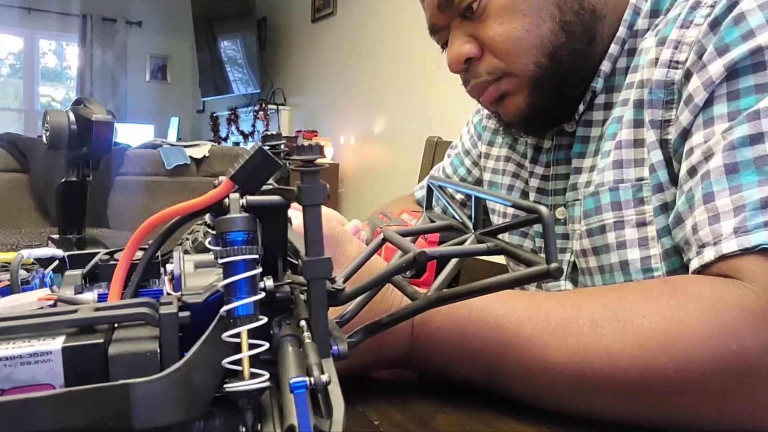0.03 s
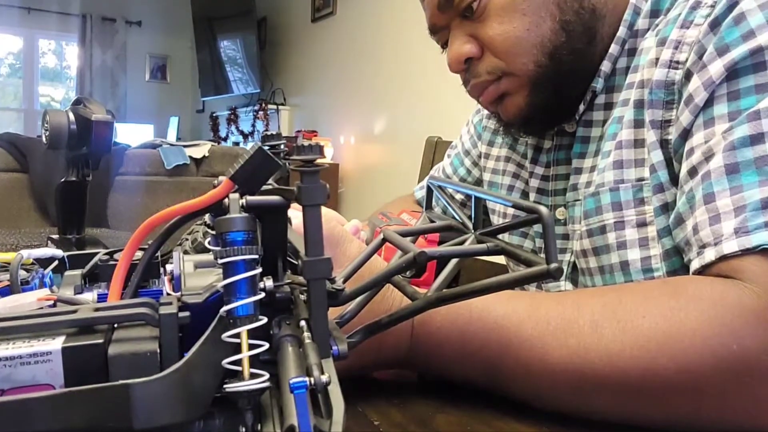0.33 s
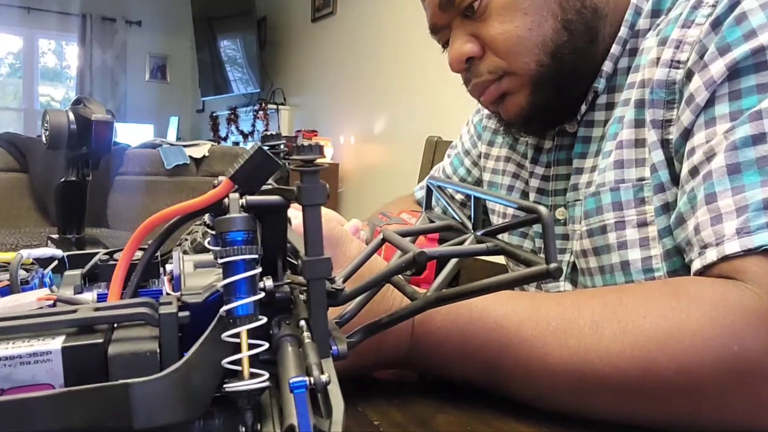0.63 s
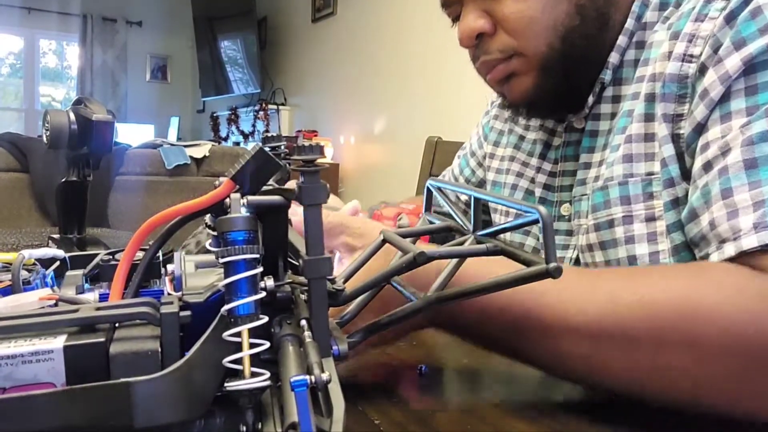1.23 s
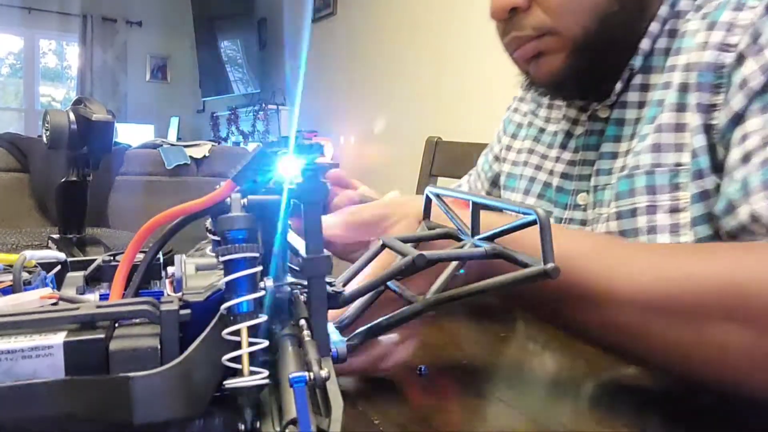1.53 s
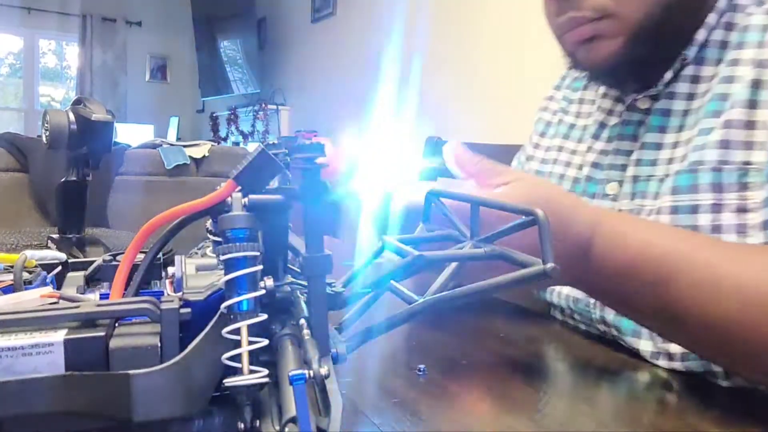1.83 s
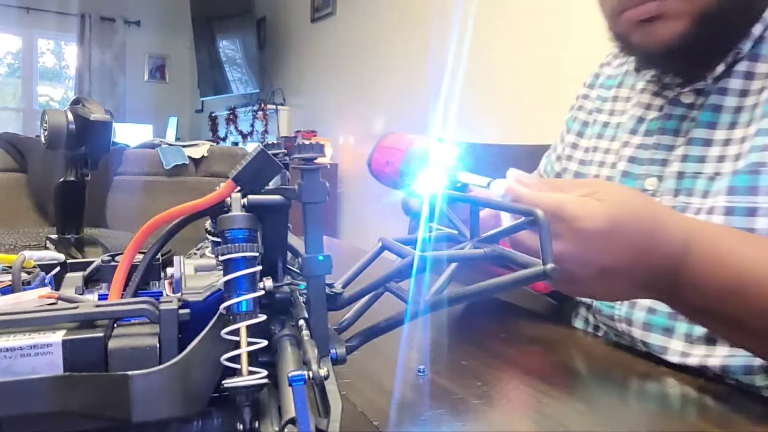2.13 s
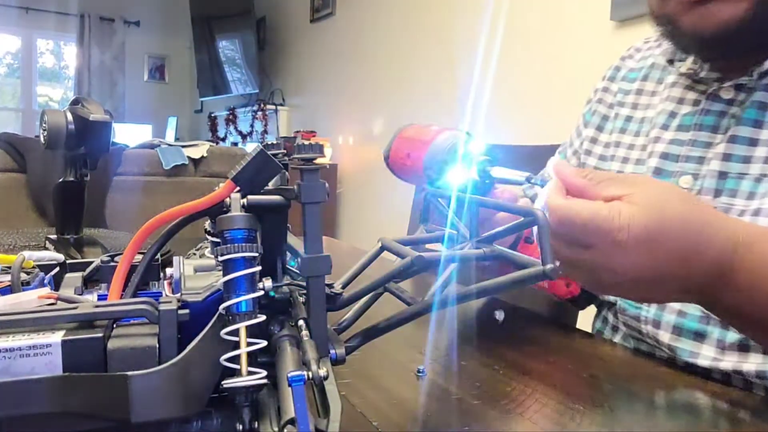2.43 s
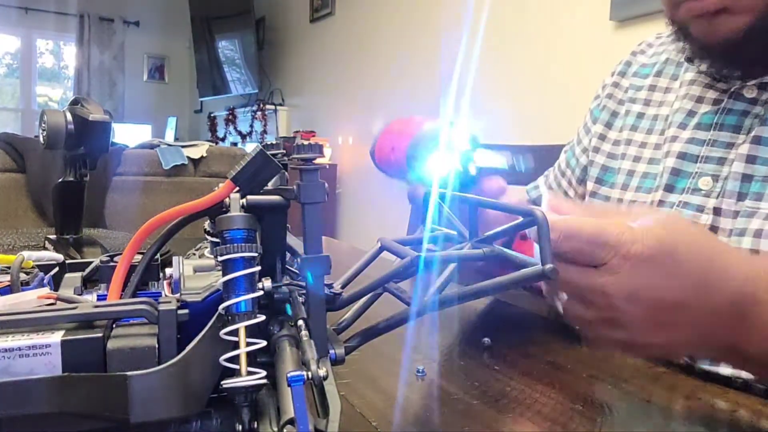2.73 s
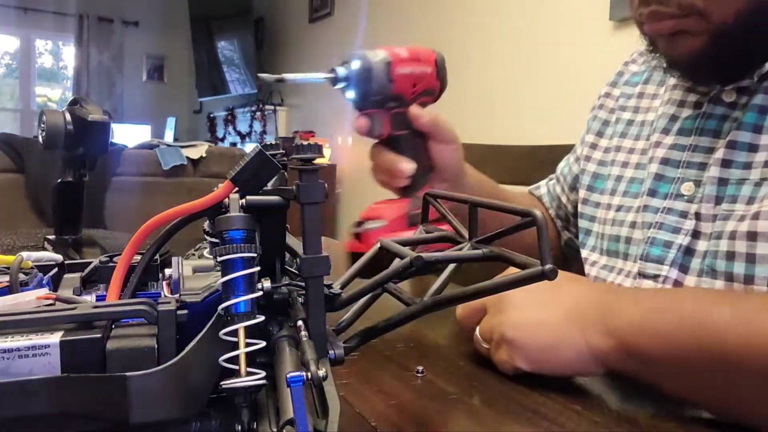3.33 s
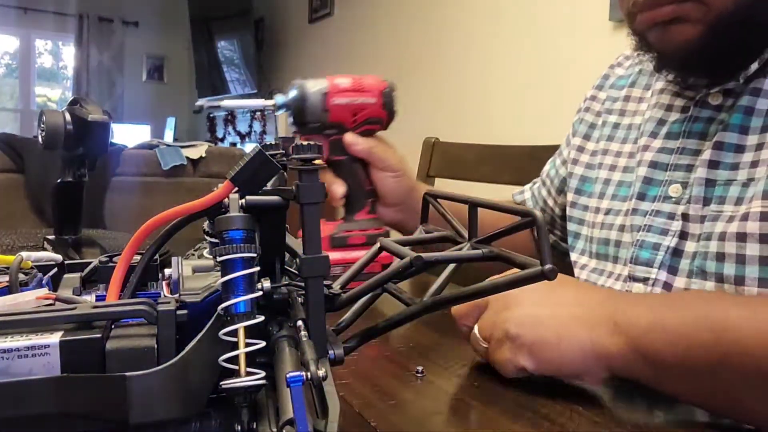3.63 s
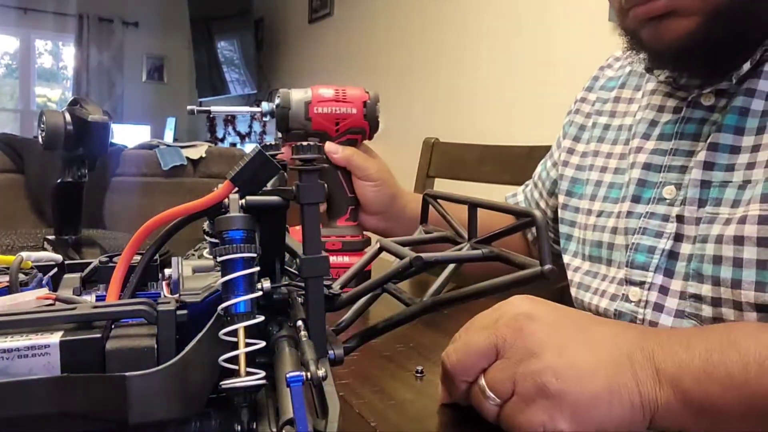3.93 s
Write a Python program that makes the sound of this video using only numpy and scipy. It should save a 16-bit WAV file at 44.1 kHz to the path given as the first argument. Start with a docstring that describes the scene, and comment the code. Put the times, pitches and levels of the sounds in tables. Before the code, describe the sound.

Close by in a quiet room, a cordless driver backs out a screw with a gritty whir, then clacks off. Light clicks and a faint rumble follow, the screw skitters across wood, and the driver is set down.

```python
"""In a quiet living room, a cordless driver backs a screw out of a model car on a wooden table: gear
teeth rasp and whine, the slipping bit jolts the chassis, and the whir stops with a clack.
After a few handling ticks the motor turns slowly, shaking the table through the battery.
The screw falls off the bit, bounces and skitters to rest.
Last, the driver is set down with a low double knock that rings the wood."""
import sys
import numpy as np
from scipy import signal
from scipy.fft import rfft, irfft
from scipy.io import wavfile
from scipy.ndimage import uniform_filter1d

SR = 44100
rng = np.random.default_rng(int(sys.argv[2]) if len(sys.argv) > 2 else 0)


def store_pcm(level_fs):
    """Save levels as 16-bit WAV."""
    pcm = np.round(np.clip(level_fs, -1, 1) * 32767).astype(np.int16)
    wavfile.write(sys.argv[1], SR, np.atleast_2d(pcm).T)


N = 176400
T = np.arange(N) / SR

# Room air: (frequency [Hz], relative level [dB])
AIR_EQ = [(25, -4), (275, -12), (400, -15.5), (680, -22.5), (4000, -30), (8000, -39), (15500, -44)]
# Faint hum in the room: (frequency [Hz], level [dB], width [Hz])
ROOM_HUM = [(127, -73.5, 7.3), (270.7, -72, 33)]
# Stereo image of diffuse sound: (frequency [Hz], left-right correlation [0-1])
STEREO_LIKENESS = [(30, 0.73), (250, 0.73), (700, 0.1), (3000, 0.086)]
# Reverb decay: (frequency [Hz], t60 [s])
ROOM_DECAY = [(100, 0.4), (1500, 0.36), (5000, 0.26), (16000, 0.26)]
# Microphone colour: (frequency [Hz], relative level [dB])
MIC_EQ = [(6200, 0), (8000, 2.5), (8900, -5), (15000, -6.5)]

# The driver lands and rocks: (time [s], relative level [dB], brightness [dB/octave])
KNOCK_CUES = [(3.7799, 1, 0), (3.7898, -8.5, 1), (3.9199, -6, -2.5)]
# Ring of the wooden table: (frequency [Hz], relative level [dB], t60 [s])
TABLE_MODES = [(44.5, -5, 0.14), (61.8, 6, 0.56), (144, -17, 0.16), (253, -5.5, 1), (339.8, -10, 0.36),
               (491.4, 0.5, 0.092), (539, -3, 0.11), (755, -15.5, 0.28), (1316, -1.5, 0.018),
               (1704, -5, 0.032)]
# Dull thud of battery on wood: (frequency [Hz], relative level [dB])
THUD_EQ = [(25, -34), (80, -3), (480, -1.5), (700, -15.5), (3100, -33), (15000, -62)]

# Clutch, trigger and handling clicks: (time [s], relative level [dB], ring [Hz])
CLICK_CUES = [(0.9076, -11, 3480), (0.9158, -4, 4510), (1.421, -27, 6100), (1.688, -26, 2130),
              (1.954, -25.5, 7200), (1.973, -30, 1980), (3.443, -28, 3310), (3.455, -26, 3090)]
# Snap of hard plastic: (frequency [Hz], relative level [dB])
PLASTIC_EQ = [(200, -54), (900, 2.5), (1800, -6), (3200, 2.5), (7000, -4), (16000, -11)]
# The bit touches metal parts: (time [s], relative level [dB], brightness [dB/octave])
PING_CUES = [(1.479, -52, -16), (1.562, -41, -3), (1.689, -46.5, -29)]
# Ring of the steel bit: (frequency [Hz], relative level [dB], t60 [s])
BIT_RING_MODES = [(3290, -3.5, 0.0077), (5550, 1, 0.0045)]
# The bit slips in the screw head: (time [s], relative jolt level [dB], relative snap level [dB])
SLIP_CUES = [(.2145, -11, -49), (.468, -23, -22), (.506, -26, -17), (.725, -21.5, -21),
             (1.224, -26.5, -20.5)]
# Ring of the car's chassis: (frequency [Hz], relative level [dB], t60 [s])
CHASSIS_MODES = [(610, -4, 0.038), (765, -1, 0.024), (835.4, 1.5, 0.12), (1000, -2, 0.011)]

# The screw hits the table: (time [s], relative level [dB], brightness [dB/octave])
BOUNCE_CUES = [(2.4564, 15.5, 0), (2.633, 6.5, -0.5), (2.7136, -2.5, 1), (2.769, -3, 0), (2.808, -9, 1),
               (2.8499, -12, 1), (2.9463, -19, 2), (2.978, -21.5, 2)]
# Tick of screw on wood: (frequency [Hz], relative level [dB])
TICK_EQ = [(200, -21.5), (900, -6), (2400, -0.5), (4500, 1.5), (6300, -1), (8000, -12), (15500, -31)]
# Short ring of each bounce: (frequency [Hz], relative level [dB], t60 [s])
BOUNCE_MODES = [(782, -17.5, 0.038), (1354, -6.5, 0.016), (2294, 3.5, 0.029), (2600, -4.5, 0.018),
                (3045, -2.5, 0.028), (3436, -4.5, 0.013), (4230, -6, 0.011), (4730, 4, 0.015),
                (6900, -7, 0.01)]

# Slow turning, battery on the table: (time [s], shake rate [Hz], level [dB])
CREEP_CURVE = [(2.126, 88, -62), (2.152, 87, -55.5), (2.33, 102.2, -48.5), (2.381, 86.2, -56.5),
               (2.458, 108.8, -44.5), (2.538, 111.7, -49), (2.565, 107, -68), (2.66, 104.6, -59)]
# Rumble of the shaken table: (frequency [Hz], relative level [dB])
RUMBLE_EQ = [(40, -44), (80, 0.5), (140, 0), (280, -2.5), (600, -32.5), (4000, -93)]
# Thin whine at low speed: (frequency [Hz], level [dB], width [Hz])
SLOW_WHINE = [(1130, -83, 30), (2050, -82, 120), (4480, -80, 180)]

# Envelope of the driver under load: (time [s], relative level [dB])
LOAD_CURVE = [(0, -0.5), (.08, -2.5), (.13, -4.5), (.25, 0), (.29, -3.5), (.35, -1), (.55, -0.5), (.68, -2),
              (.83, -1), (.87, -10), (.905, -3.5), (.93, -33)]
# Rasp of the gear teeth: (frequency [Hz], relative level [dB])
RASP_EQ = [(150, -17), (480, -16.5), (950, -2), (3800, -1), (4700, -2.5), (8000, -9), (15500, -20)]
# Gear whine under load: (frequency [Hz], level [dB], width [Hz])
GEAR_WHINE = [(1130, -62.5, 50), (1750, -63, 160), (2100, -62, 180), (2950, -65, 170), (5890, -67, 250)]


def amp(db):
    """Decibels to gain."""
    return 10 ** (np.asarray(db) / 20)


def unit_rms(x):
    """Scales to rms 1."""
    return x / np.sqrt(np.mean(x ** 2) + 1e-20)


def curve_at(points, hz):
    """Reads a table on a log-frequency axis."""
    freqs, values = np.transpose(points)
    return np.interp(np.log(hz + 1), np.log(freqs + 1), values)


def add(mix, at_s, sound):
    """Drops a sound into the mix at its cue."""
    part = mix[..., round(at_s * SR):][..., :sound.shape[-1]]
    part += sound[..., :part.shape[-1]]


def eq(x, points, tilt_db=0):
    """Causal EQ of unit energy, tilted by tilt_db per octave above 500 Hz."""
    hz = abs(np.fft.fftfreq(4096, 1 / SR))
    octaves = np.log2(np.maximum(hz, 500) / 1000)
    log_gain = np.log(amp(curve_at(points, hz) + tilt_db * octaves))
    taps = np.fft.ifft(np.exp(signal.hilbert(log_gain).conj())).real  # minimum phase
    return signal.fftconvolve(x, (taps / np.linalg.norm(taps))[None], axes=1)


def small_body(x, hz):
    """Low cut: a small body radiates little below hz."""
    return signal.sosfilt(signal.butter(2, hz, "high", fs=SR, output="sos"), x)


def drift(rate_hz):
    """Smooth random modulation of rms 1."""
    rolloff = np.exp(-(np.fft.rfftfreq(N, 1 / SR) / rate_hz) ** 2)
    return unit_rms(irfft(rfft(rng.standard_normal(N)) * rolloff, N))


def diffuse_noise(size):
    """Stereo noise, narrow in the bass and wide in the treble."""
    left, other = rfft(rng.standard_normal((2, size)))
    likeness = np.clip(curve_at(STEREO_LIKENESS, np.fft.rfftfreq(size, 1 / SR)), -1, 1)
    right = likeness * left + np.sqrt(1 - likeness ** 2) * other
    return irfft(np.array([left, right]), size)


def grains(per_s):
    """A random train of tiny impacts, rms 1."""
    return unit_rms(rng.standard_normal((1, N)) * (rng.random(N) < per_s / SR))


def tones(rows, clock=T):
    """Wavering tones whose pitch follows the pace of the clock."""
    out = np.zeros(N)
    for hz, db, width_hz in rows:
        phase = 2 * np.pi * hz * clock
        out += amp(db) * (drift(width_hz) * np.cos(phase) + drift(width_hz) * np.sin(phase))
    return out


def ring(modes, tilt_db=0):
    """Decaying modes of a struck body, tilted by tilt_db per octave."""
    t = T[:SR // 2]
    return sum(amp(db - 60 * t / t60 + tilt_db * np.log2(hz / modes[0][0])) * np.sin(2 * np.pi * hz * t)
               for hz, db, t60 in modes)


def contact(t60, chatter_db):
    """A sharp transient, then a brief chatter of the surfaces."""
    t = T[:SR // 5]
    burst = rng.standard_normal((1, len(t))) * 1e-3 ** (t / t60)
    burst *= amp(chatter_db) / np.linalg.norm(burst)
    burst[:, 0] += 1
    return burst / np.linalg.norm(burst)


def place(x, left_db, left_lag_ms, wet_db):
    """Stages a source in the room: panned direct sound, scattered near reflections and a tail."""
    fade_in_s, echo_s, echo_t60 = .008, .0105, .025
    hz, t, spectrum = signal.stft(diffuse_noise(SR * 3 // 4), SR, nperseg=256)
    decay = 1e-3 ** (t / curve_at(ROOM_DECAY, hz)[:, None])
    response = signal.istft(spectrum * decay, SR, nperseg=256)[1]
    t = T[:response.shape[1]]
    reflections = amp(5) * (t > echo_s) * 1e-3 ** (abs(t - echo_s) / echo_t60)
    response *= np.minimum(t / fade_in_s, 1) ** 2 + reflections
    response *= amp(wet_db) / np.linalg.norm(response[0])
    lag = round(left_lag_ms * SR / 1000)
    response[0, max(lag, 0)] += amp(left_db / 2)  # direct sound
    response[1, max(-lag, 0)] += amp(-left_db / 2)
    return signal.fftconvolve(x, response, axes=1)[:, :N]


def room_tone():
    """The bed: gently wavering room air with a faint hum."""
    air = unit_rms(eq(diffuse_noise(N + SR), AIR_EQ)[:, SR:SR + N])
    return amp(-64) * air * amp(1.3 * drift(9)) + tones(ROOM_HUM)


def set_down():
    """The battery's edge scuffs the table, then lands and rocks once, ringing the wood."""
    out = np.zeros((2, N))
    for at_s, db, bright_db in KNOCK_CUES:
        add(out, at_s, -amp(db - 27) * ring(TABLE_MODES, bright_db))
        thud = eq(contact(t60=.17, chatter_db=7.5), THUD_EQ, bright_db)
        add(out, at_s, -amp(db + 4.5) * thud)
    scuff = eq(contact(t60=1, chatter_db=39), THUD_EQ, tilt_db=.5)
    add(out, 3.757, amp(-11) * scuff)
    return place(out, left_db=.7, left_lag_ms=-.04, wet_db=-8)


def handling():
    """Plastic clicks of the tool, pings of its bit, and slips that jolt the chassis."""
    out = np.zeros((2, N))
    for at_s, db, hz in CLICK_CUES:
        bright_db = 6.4 * np.log2(hz / 3500)  # small parts ring higher and click brighter
        click = eq(contact(t60=.05, chatter_db=15), PLASTIC_EQ, bright_db)
        add(out, at_s, amp(db - 7.5) * click)
        add(out, at_s, amp(db - 31) * ring([(hz, 0, .011)]))
    for at_s, db, bright_db in PING_CUES:
        add(out, at_s, amp(db) * small_body(ring(BIT_RING_MODES, bright_db), hz=1490))
    for at_s, jolt_db, snap_db in SLIP_CUES:
        add(out, at_s, amp(jolt_db - 25.5) * small_body(ring(CHASSIS_MODES), hz=396))
        snap = eq(contact(t60=.042, chatter_db=1), PLASTIC_EQ, tilt_db=-6)
        add(out, at_s, amp(snap_db - 5.5) * snap)
    return place(out, left_db=5, left_lag_ms=.05, wet_db=-3)


def falling_screw():
    """The screw hops and skitters to rest; its ring is close and dry, its ticks fill the room."""
    ticks, rings = np.zeros((2, 2, N))
    for at_s, db, bright_db in BOUNCE_CUES:
        modes = [(hz, mode_db + rng.standard_normal(), t60) for hz, mode_db, t60 in BOUNCE_MODES]
        add(ticks, at_s, amp(db - 16) * eq(contact(t60=.018, chatter_db=12), TICK_EQ, bright_db))
        add(rings, at_s, amp(db - 42.5) * small_body(ring(modes, bright_db), hz=1000))
    skitter_peak_s, spread_s = 2.88, .16
    skitter = amp(-62) * grains(per_s=900) * np.exp(-((T - skitter_peak_s) / spread_s) ** 2)
    ticks += eq(skitter, TICK_EQ)[:, :N]
    return (place(ticks, left_db=6, left_lag_ms=-.07, wet_db=-1)
            + place(rings, left_db=5, left_lag_ms=-.07, wet_db=-13))


def creeping_driver():
    """The motor turns slowly and unevenly, shaking the table under a faint whine."""
    times, shake_hz, db = np.transpose(CREEP_CURVE)
    rate_hz = np.interp(T, times, shake_hz) * (1 + .063 * drift(41))
    phase = 2 * np.pi * np.cumsum(rate_hz) / SR
    level = amp(np.interp(T, times, db, left=-140, right=-140))
    shake = np.cos(phase) + amp(-19) * (np.cos(2 * phase) + np.cos(3 * phase))
    rumble = amp(-7) * unit_rms(eq(rng.standard_normal((1, N)), RUMBLE_EQ)[:, :N])
    gate = uniform_filter1d(1. * (T > times[1]) * (T < times[-3]), size=900)
    whine = gate * tones(SLOW_WHINE)
    return place(level * (shake + rumble) + whine, left_db=1, left_lag_ms=0, wet_db=-4.5)


def churn(x, depth_db=3.2, patch_hz=480, patch_s=.04):
    """Patches of the spectrum swell and sink as the gears shift under load."""
    spectrum = signal.stft(x, SR, nperseg=512)[2]
    patches = rng.standard_normal(spectrum.shape[1:])
    patches = uniform_filter1d(patches, round(patch_hz * 512 / SR), axis=0)
    patches = uniform_filter1d(patches, round(patch_s * SR / 256), axis=1)
    gain = unit_rms(amp(depth_db * unit_rms(patches)))
    return signal.istft(spectrum * gain, SR, nperseg=512)[1][:, :N]


def loaded_driver():
    """Gears rasp and whine with the wavering motor; the load swells each turn and rattles the chassis."""
    turns_per_s, swell_peak_s = 10.9, .07
    motor_hz, motor_waver, tooth_depth = 288.4, .02, .43
    load_db = np.interp(T, *np.transpose(LOAD_CURVE), right=-120)
    swell_db = 1.4 * np.cos(2 * np.pi * turns_per_s * (T - swell_peak_s))
    flutter_db = .6 * drift(40)
    level = amp(load_db + swell_db + flutter_db)
    clock = np.cumsum(1 + motor_waver * drift(9)) / SR
    teeth = rng.standard_normal(N) * (1 + tooth_depth * np.cos(2 * np.pi * motor_hz * clock))
    grit = amp(-54.5) * grains(per_s=270)
    rasp = eq(amp(-49.5) * unit_rms(teeth) + grit, RASP_EQ)[:, :N]
    rattle = signal.fftconvolve(grains(per_s=190), ring(CHASSIS_MODES)[None])[:, :N]
    gears = churn(rasp + tones(GEAR_WHINE, clock))
    return place(level * (gears + amp(-60) * unit_rms(rattle)), left_db=5, left_lag_ms=.07, wet_db=1)


def scene():
    """The full mix: driver, foley and room tone."""
    return loaded_driver() + creeping_driver() + handling() + falling_screw() + set_down() + room_tone()


def record(dry):
    """The master chain: microphone colour, a small trim and a steep high cut."""
    coloured = eq(dry, MIC_EQ)[:, :N] * amp(-1.5)
    high_cut = signal.firwin(511, 15800, window=("kaiser", 9), fs=SR)
    return signal.oaconvolve(coloured, high_cut[None], "same")


dry = scene()
out = record(dry)
store_pcm(out)
```